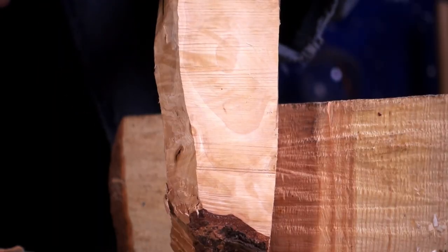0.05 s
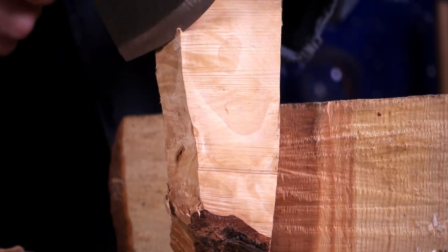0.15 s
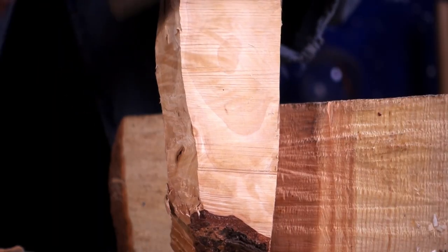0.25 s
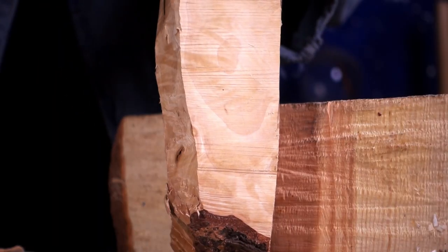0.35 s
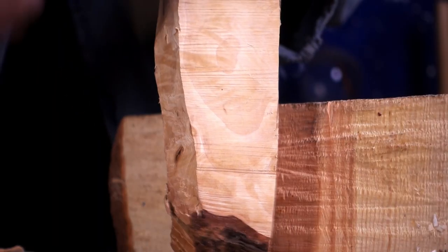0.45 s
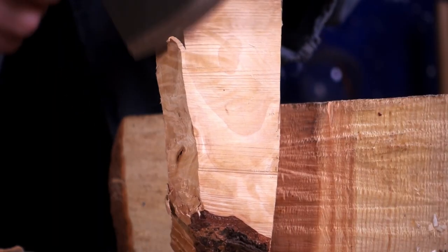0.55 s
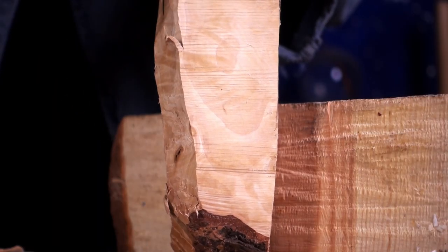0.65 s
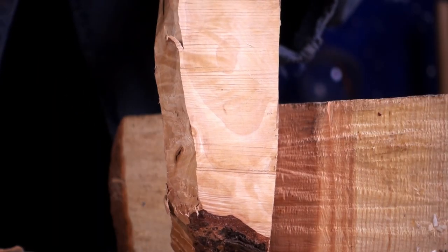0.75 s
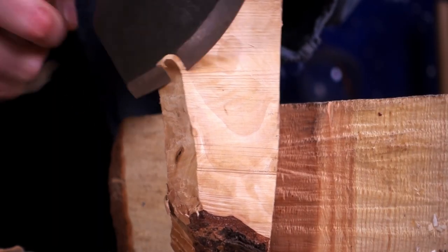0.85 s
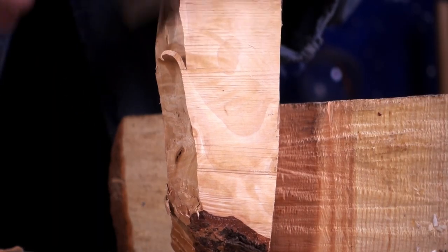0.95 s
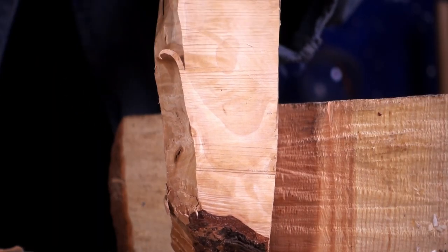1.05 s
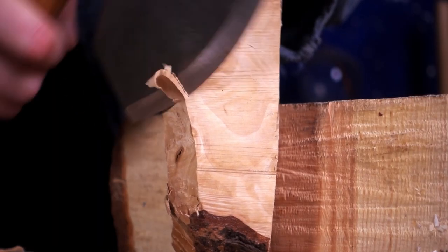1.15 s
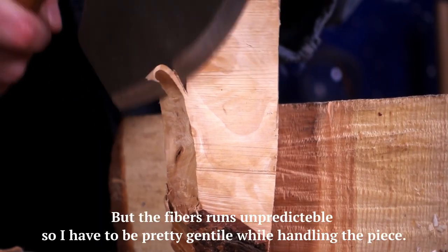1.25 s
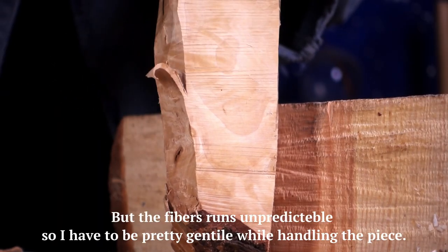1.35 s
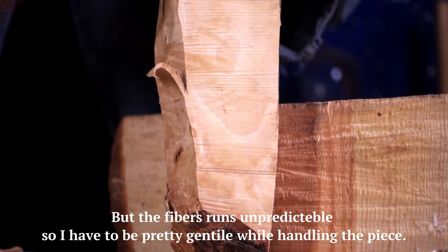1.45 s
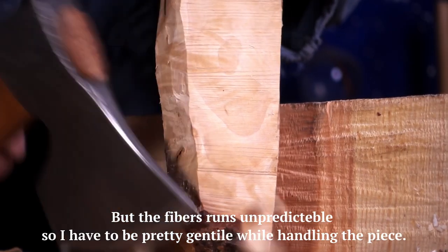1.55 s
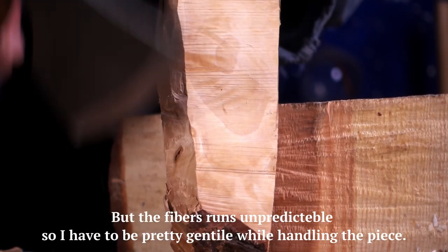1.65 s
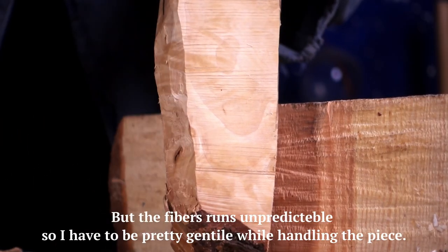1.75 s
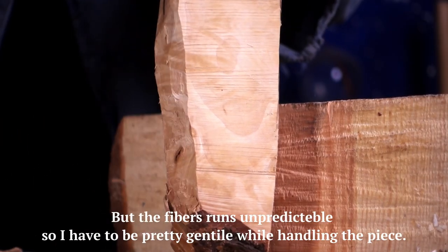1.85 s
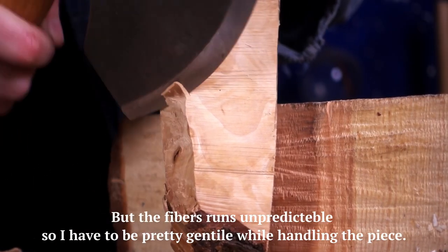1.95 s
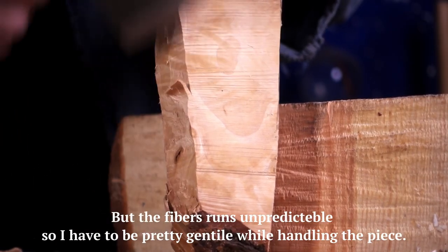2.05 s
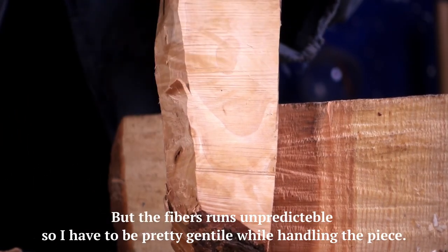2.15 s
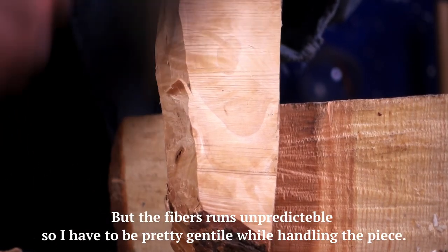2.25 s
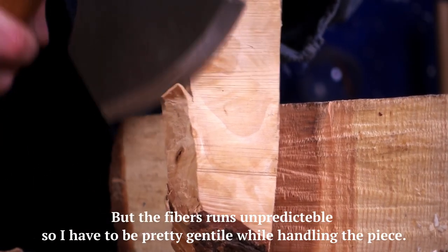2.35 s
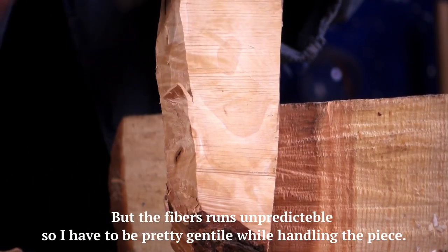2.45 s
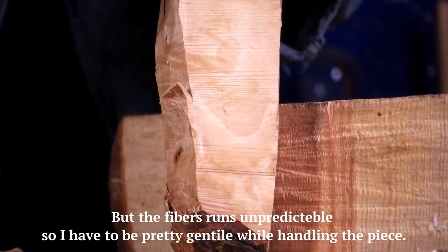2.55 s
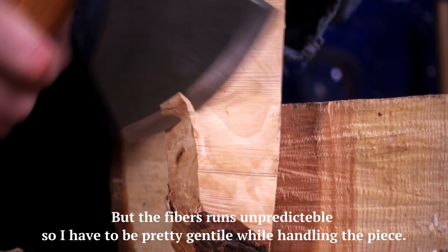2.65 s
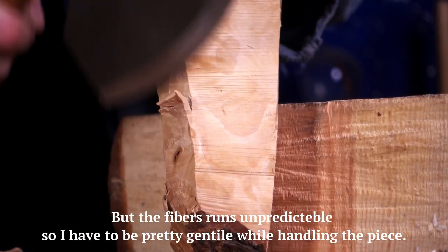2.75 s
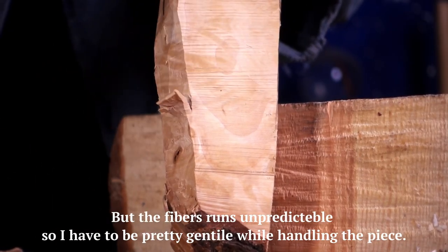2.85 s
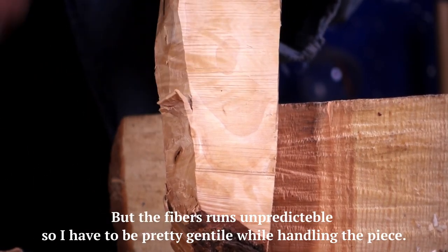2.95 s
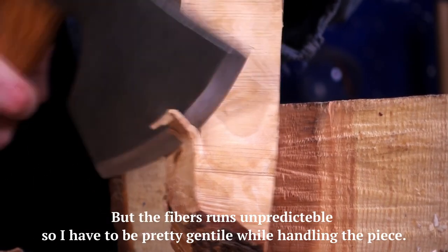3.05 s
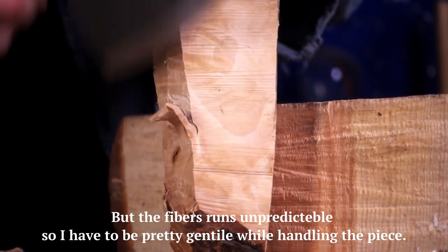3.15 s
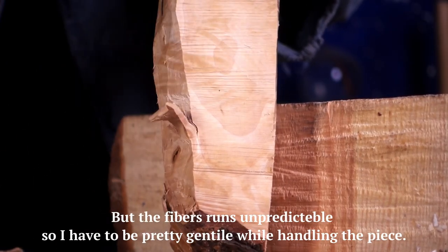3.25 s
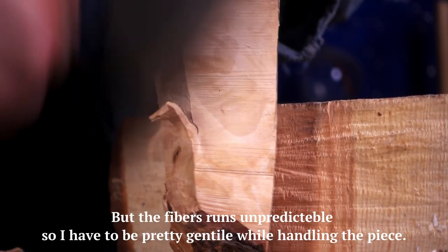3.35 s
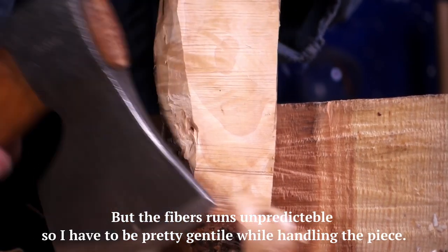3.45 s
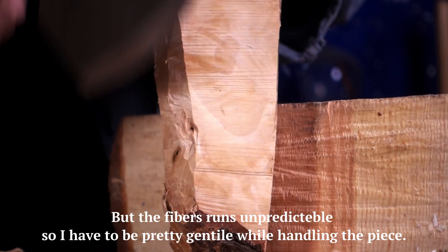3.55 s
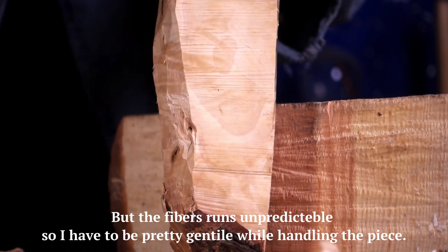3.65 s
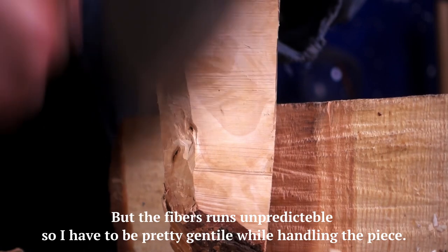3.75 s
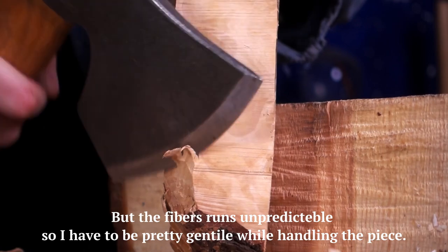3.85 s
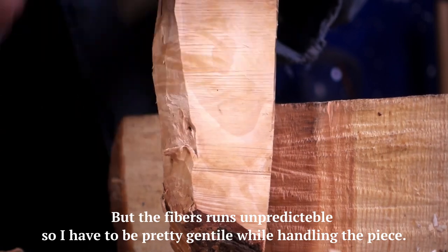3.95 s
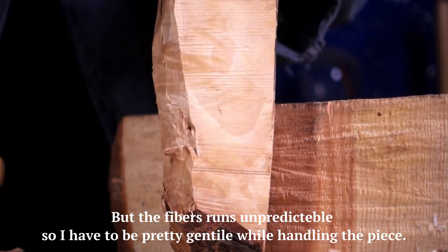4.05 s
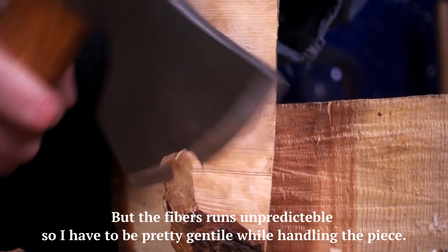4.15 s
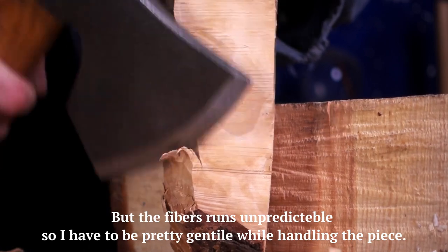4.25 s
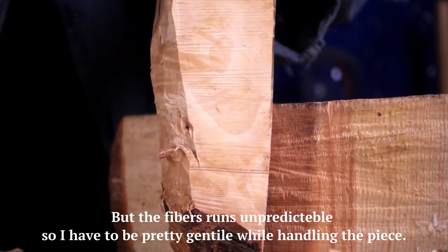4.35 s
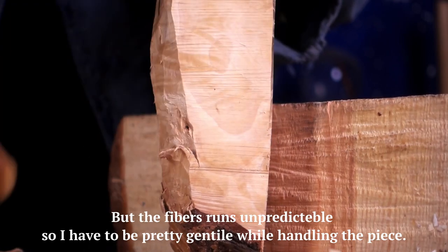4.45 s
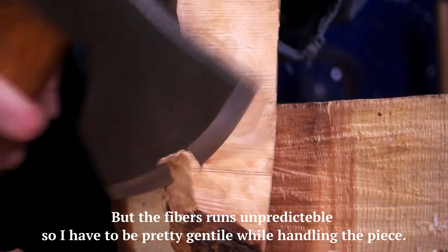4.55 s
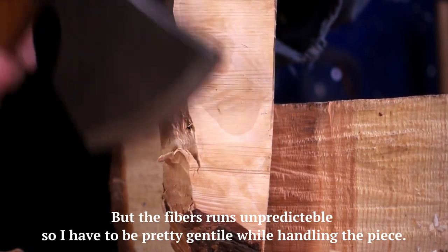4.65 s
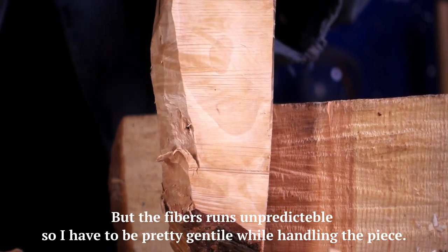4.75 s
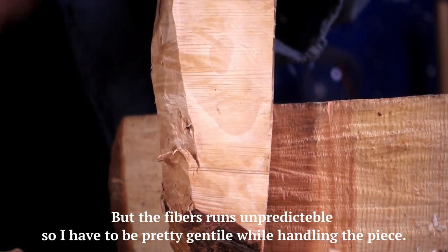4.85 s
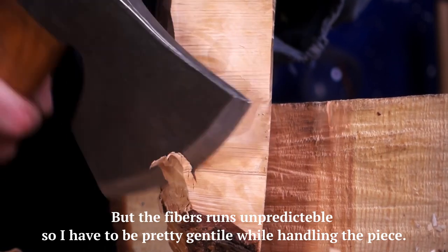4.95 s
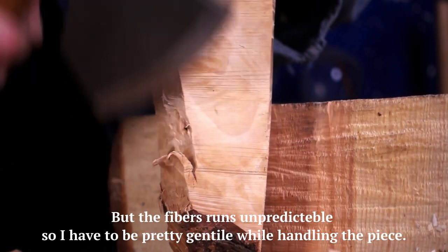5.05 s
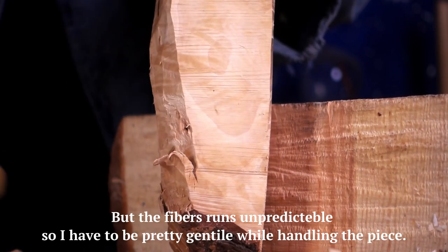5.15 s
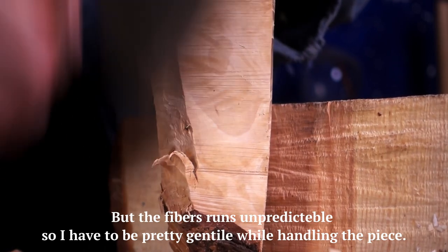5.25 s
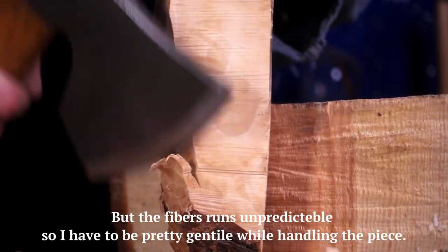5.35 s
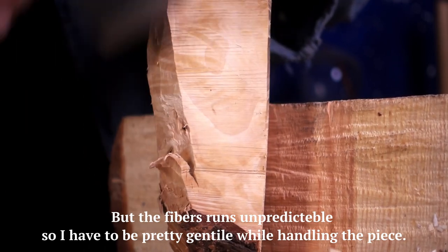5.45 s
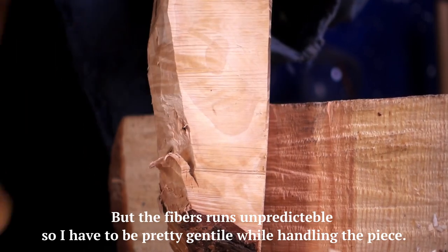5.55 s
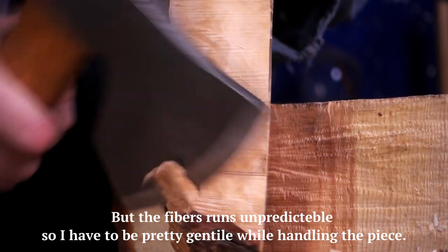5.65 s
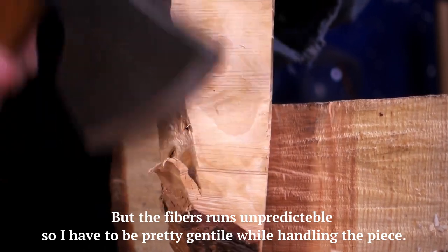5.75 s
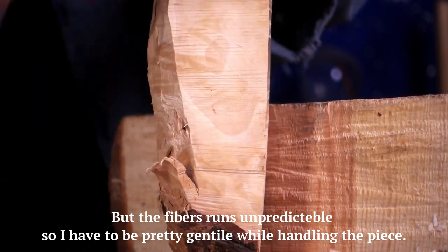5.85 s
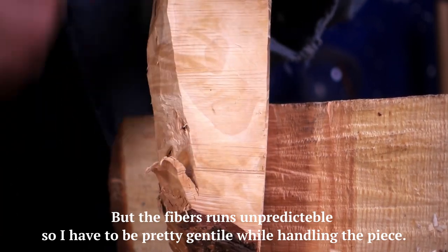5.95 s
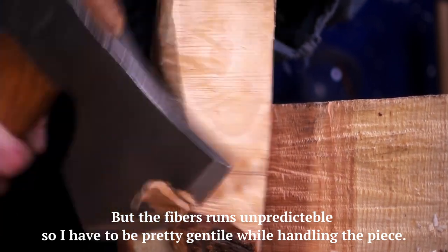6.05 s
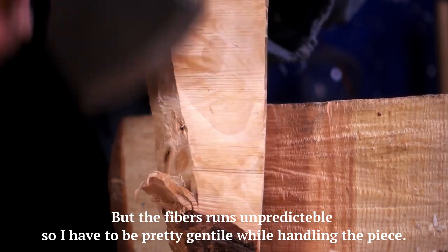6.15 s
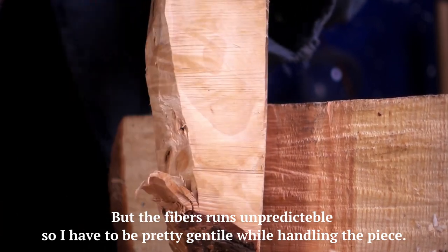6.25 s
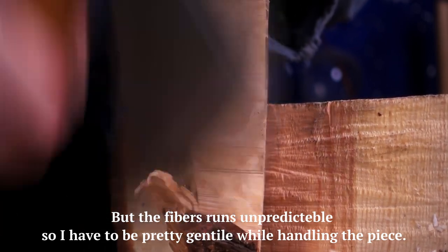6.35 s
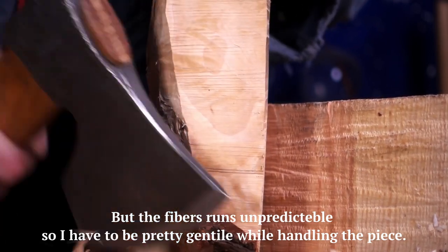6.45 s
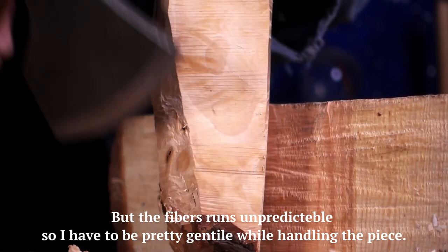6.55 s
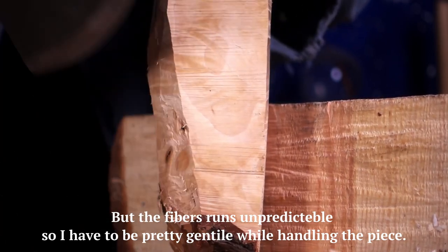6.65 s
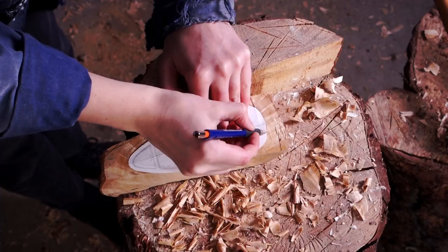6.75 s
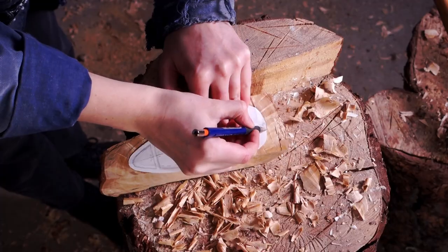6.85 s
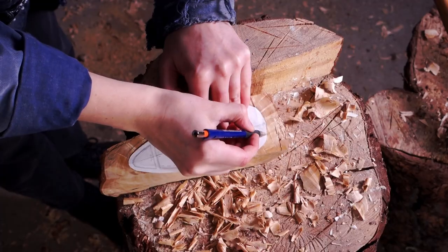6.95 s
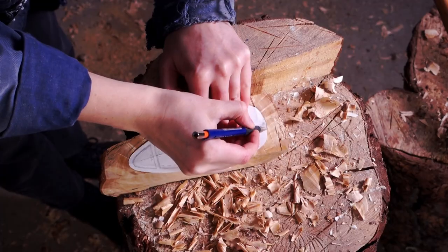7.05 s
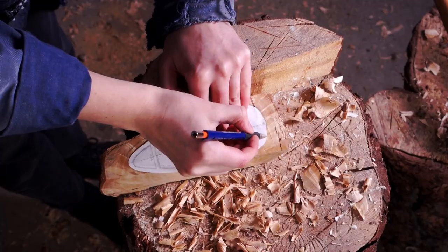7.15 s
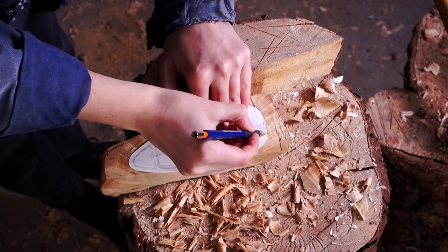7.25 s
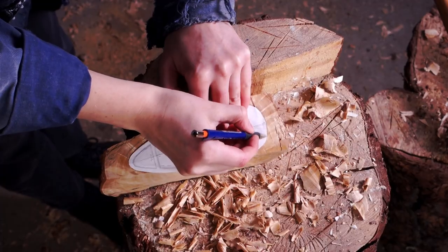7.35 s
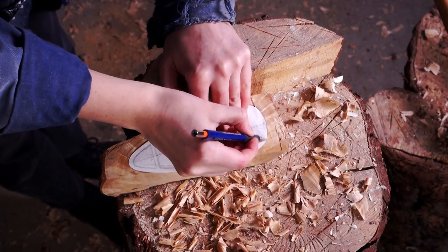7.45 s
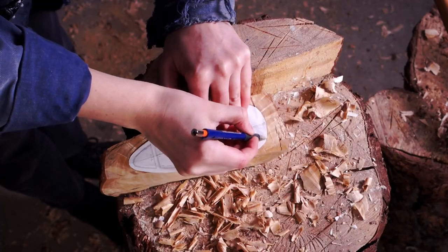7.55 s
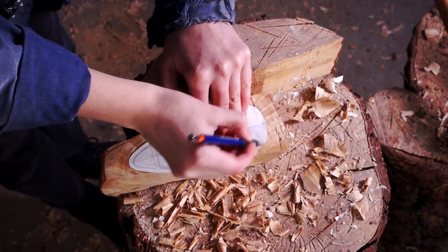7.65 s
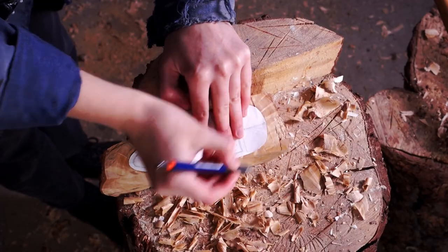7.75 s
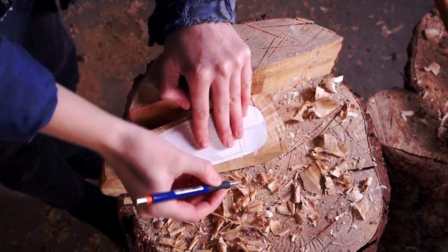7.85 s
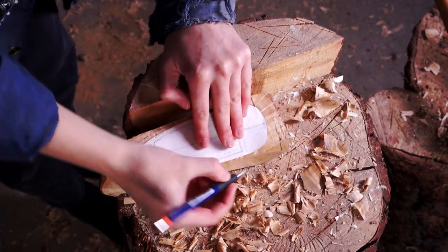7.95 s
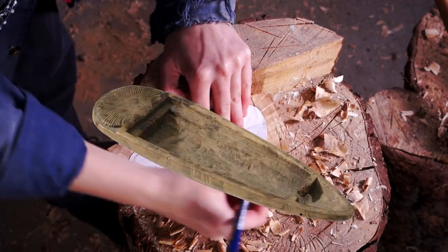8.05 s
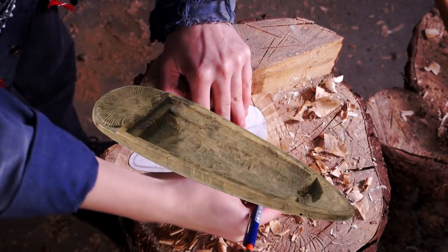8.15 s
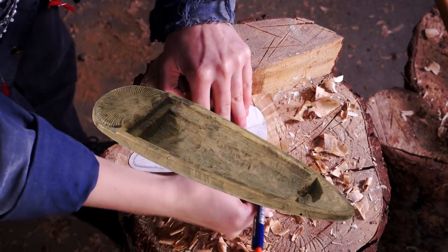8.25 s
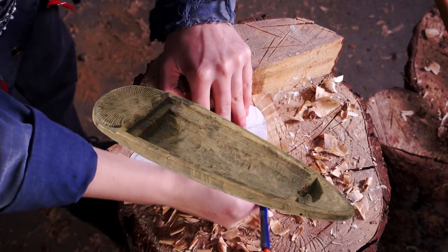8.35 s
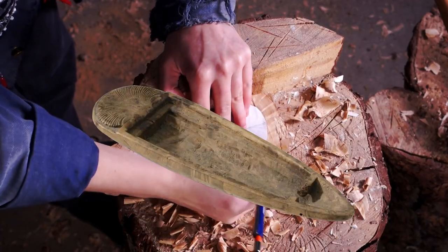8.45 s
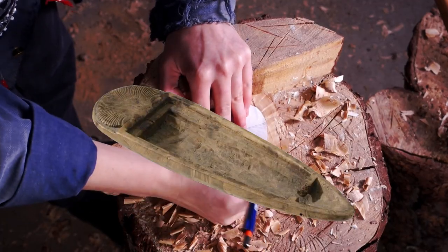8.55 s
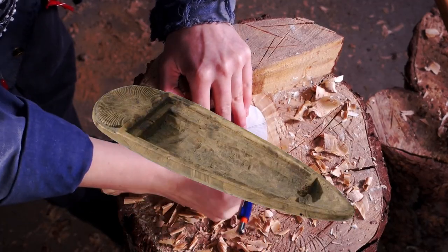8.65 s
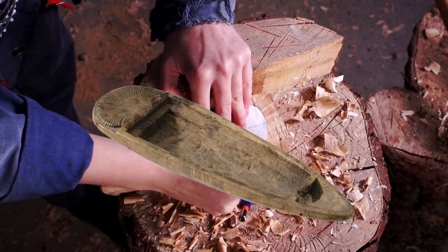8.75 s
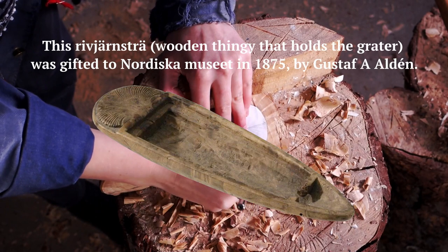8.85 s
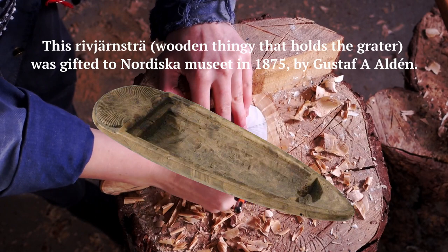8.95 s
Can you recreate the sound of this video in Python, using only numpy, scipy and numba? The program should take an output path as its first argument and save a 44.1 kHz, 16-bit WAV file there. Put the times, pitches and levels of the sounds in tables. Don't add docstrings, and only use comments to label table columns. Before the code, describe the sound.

Brisk axe blows crack and knock through hard wood in a live workshop, cutting to soft sleeve shuffles, crunching shavings and tiny motor ticks.

```python
import sys
import numpy as np
from scipy import signal
from scipy.fft import rfft, irfft
from scipy.io import wavfile
from numba import njit

SR = 44100
rng = np.random.default_rng(int(sys.argv[2]) if len(sys.argv) > 2 else 0)


def gain_from_decibels(decibels):
    exponent = np.asarray(decibels, float) / 20
    return 10 ** exponent


def to_wav(sig):
    pcm = np.clip(np.atleast_2d(sig), -1, 1) * 32767
    pcm = np.round(pcm).astype(np.int16)
    wavfile.write(sys.argv[1], SR, pcm.T)


N = 396900
CUT_S = 6.708


def along(table, hz, count=1):
    rows = np.array(table, float)
    return np.interp(np.log(hz + 1), np.log(rows[:, 0] + 1), rows[:, count])


def unit(x):
    return x / np.sqrt(np.sum(x ** 2))


def band(x, lo_hz, hi_hz):
    return signal.sosfilt(signal.butter(2, [lo_hz, hi_hz], "band", fs=SR, output="sos"), x)


def add(track, sound, s):
    i = int(s * SR)
    track[i:i + len(sound)] += sound[:N - i]


def ring(modes, detune=0.008, size=4096):
    t = np.arange(size)[:, None] / SR
    hz, db, t60 = np.transpose(modes)
    luck = rng.standard_normal((2, len(hz)))
    waves = np.sin(2 * np.pi * hz * (1 + detune * luck[0]) * t) * np.exp(-np.log(1000) * t / t60)
    gains = gain_from_decibels(db + 1.2 * luck[1])
    return unit(waves @ (gains * (-1) ** np.arange(len(hz))))


def clicks(events, cycles, lift_db):
    out, t = np.zeros(N), np.arange(1024) / SR
    for s, db, hz in events:
        swell = hz * t * np.exp(1 - hz * t / cycles) / cycles
        add(out, gain_from_decibels(db + lift_db) * np.sin(2 * np.pi * hz * t) * swell, s)
    return out


def breaks(length_s, spiky_db):
    t = np.arange(4096) / SR
    swell = (1 - np.exp(-t / 0.00024)) * np.exp(-t / length_s)
    return unit(rng.standard_normal(4096) * gain_from_decibels(spiky_db * rng.exponential(size=4096)) * swell)


def bite(length_s, drag_db, size):
    force = gain_from_decibels(drag_db) * breaks(length_s, 1.7)
    add(force, unit(np.hanning(size)), 0)
    return force


# (frequency [Hz], level [dB], t60 [s])
KNOCK = [(620, -4, .022), (765, 0, .022), (860, 0, .02), (965, -1, .018), (1070, -1, .016),
         (1200, -3, .014)]
BODY = [(143, 8.5, 0.065), (189, 4.5, 0.075), (232, 0, 0.14), (238.5, 12.5, 0.026)]
HOLLOW = [(321, 1, 0.029), (450, 2, 0.018), (519, -11.5, 0.075)]
BRIGHT = [(1385, 0, .012), (1570, 0, .012), (1790, -1, .01), (2000, -1, .01), (2230, -2, .009)]
# (frequency [Hz], level [dB], t60 [s])
CRACK = [(2480, -1, 0.0058), (2750, -3.5, 0.0075), (3020, -6.5, 0.0068), (3290, -8.5, 0.0056),
         (3700, -6.5, 0.002)]
# (multiple of chip pitch [ratio], level [dB], t60 [s])
CHIP = [(.84, -2, .008), (1, 0, .011), (1.15, -4, .007), (1.4, -3, .003), (1.75, -6, .002)]


def billet(db, thin_hz, chip_db, chip_hz):
    wood = ring(KNOCK) + gain_from_decibels(db["body"] - 4) * ring(BODY) + gain_from_decibels(db["hollow"]) * ring(HOLLOW)
    wood += gain_from_decibels(db["bright"] - 2.5) * ring(BRIGHT)
    wood += gain_from_decibels(db["thin"]) * ring([(thin_hz, 0, .025)], 0)
    wood -= gain_from_decibels(chip_db - 3.5) * ring(np.array(CHIP) * [chip_hz, 1, 1])
    wood -= gain_from_decibels(db["crack"]) * ring(CRACK, 0.03)
    return wood


# (frequency [Hz], t60 [s])
STEEL = [(3600, .008), (5190, .012), (7230, .009), (10320, .02)]
STEEL_DB = [-27.5, -33, -24]


def steel_head(head_db, low_db):
    upper_db = head_db + 0.5 * rng.standard_normal(len(STEEL_DB)) + STEEL_DB
    steel = np.zeros(4096)
    for mode_db, (hz, t60) in zip([low_db, *upper_db], STEEL):
        twins = [(hz, 0, t60), (1.018 * hz, -4, t60)]
        steel += gain_from_decibels(mode_db + 2.5) * ring(twins, 0.003)
    return steel


# (frequency [Hz], level [dB], t60 [s])
THUMP = [(63.7, -9.5, 0.35), (92.2, -2, 0.4), (130, -1.5, 0.083)]


def block_thump():
    swell = 1 - np.exp(-np.arange(16384) / SR / 0.011)
    return signal.fftconvolve(ring(THUMP, size=16384) * swell, np.hanning(384) / 150)


# (time [s], force [dB], firmness of seat [dB], depth of bite [dB], thin-end pitch [Hz])
CHOPS = [(0.1465, -37.5, 11.5, -9.5, 800), (0.4885, -21.5, -3.5, -3, 1325), (0.8244, -20, -1.5, -2.5, 1508),
         (1.1701, -18, -6, 3, 2118), (1.512, -16, -12.5, -6, 1514), (1.9294, -20.5, 0, 1.5, 1390),
         (2.2862, -13, -0.5, -1.5, 1643), (2.6594, -11.5, -6.5, 7.5, 1570), (3.0327, -13, -7, 11, 2320),
         (3.403, -14.5, -14.5, 5, 2200), (3.81, -19.5, -6, -3, 1220), (4.1878, -15.5, -6, 1.5, 1486),
         (4.5579, -14, -3, -3, 1590), (4.929, -13.5, 1, -3, 1520), (5.2962, -15, 4, -8, 1602),
         (5.668, -12.5, 0.5, 3, 1710), (6.0308, -11.5, -11.5, 0, 1265), (6.4057, -14, -21, 2.5, 1736)]
# (time [s], steel head [dB], its lowest mode [dB], curling chip [dB], chip pitch [Hz])
CUTS = [(0.1462, 11, -42.5, -8.5, 2860), (0.4885, 2, -21.5, -9.5, 3280), (0.8242, 2.5, -30.5, -18.5, 3200),
        (1.1702, 2, -14, -2, 3080), (1.512, 8.5, -16.5, -6.5, 2450), (1.9294, -2, -15, -20.5, 2500),
        (2.2863, -1.5, -24.5, -33.5, 2940), (2.6593, 0.5, -18, -16, 2900), (3.0326, 10.5, -36.5, 4, 2570),
        (3.403, 2, -23, -26.5, 3130), (3.81, -0.5, -31, -14, 3220), (4.1875, 1, -23, -12, 3330),
        (4.5578, 1.5, -28.5, -26, 2600), (4.9289, -5, -16.5, -10.5, 2930), (5.2964, -1, -11, -5.5, 3110),
        (5.668, 9, -42, 0, 3024), (6.0309, 5, -21.5, -1.5, 2515), (6.4054, 2.5, -21, -7, 2480)]
# (level [dB], by seat [dB per dB], by bite [dB per dB])
LAYERS = dict(thump=(-2, 1, 0.1), body=(-1, 0.56, 0.1), hollow=(-4.5, 0.38, 0.1), bright=(0, 0.1, 0.63),
          thin=(-8, 0.069, -.9), crack=(-12.5, -.1, .5), tear=(-36.5, -.7, .3), drag=(0.038, -0.38, 0.1))


def chops():
    out, thump = np.zeros((2, N))
    for (s, force_db, seat_db, bite_db, thin_hz), (_, head_db, low_db, chip_db, chip_hz) in zip(CHOPS, CUTS):
        db = {}
        for name, (base, by_seat, by_bite) in LAYERS.items():
            db[name] = base + by_seat * seat_db + by_bite * bite_db
        wood = billet(db, thin_hz, chip_db, chip_hz)
        steel = steel_head(head_db, low_db)
        wood_force = bite(0.0022, -10 + db["drag"], size=8)
        steel_force = bite(0.0082, db["drag"], size=3)
        tear = band(breaks(0.0081, 3.5), 2600, 17000)
        add(out, gain_from_decibels(force_db + 22) * signal.fftconvolve(wood_force, wood), s)
        add(out, gain_from_decibels(force_db + 24.5) * signal.fftconvolve(steel_force, steel), s)
        add(out, gain_from_decibels(force_db + db["tear"] + 40.5) * tear, s)
        add(thump, gain_from_decibels(force_db + db["thump"] + 27.5) * block_thump(), s)
    return out, thump


# (frequency [Hz], level [dB], t60 [s])
LANDING = [(110, -5, .05), (150, -4, .035), (210, -3, .035), (300, 2, .009), (600, 1, .005)]
# (time [s], level [dB])
LANDINGS = [
    (1.5755, -13),
    (3.4425, -12.5),
    (6.430, -13.5),
]


def landings():
    out = np.zeros(N)
    for s, db in LANDINGS:
        add(out, gain_from_decibels(db + 29) * np.convolve(ring(LANDING), np.hanning(40) / 20), s)
    return out


# (time [s], peak level [dB], pitch [Hz])
SNAPS = [(0.4394, -53, 8290), (1.2084, -29, 10400), (1.3803, -49, 7180), (1.5429, -17.5, 11300),
         (1.5664, -33.5, 10200), (1.6796, -41.5, 9660), (1.6931, -40.5, 8690), (2.2922, -31, 10600),
         (2.4114, -44.5, 7770), (3.2154, -60.5, 7110), (3.4244, -22.5, 10300), (3.5808, -46, 11200),
         (3.5914, -41, 9010), (3.6242, -44.5, 8160), (3.6691, -47.5, 7320), (4.2124, -38, 10500),
         (4.567, -21, 10400), (4.9634, -26, 10300), (5.7614, -37.5, 10300), (6.0604, -17, 10500),
         (6.4113, -25, 7430), (6.4274, -32, 10400), (6.6154, -52, 7540)]


def snaps():
    return clicks(SNAPS, 0.34, 10.3)


# (time [s], rub level [dB], rustle level [dB], rise [s per 20 dB], fade [s per 20 dB])
SHUFFLE = [
    (7.68, -78, -44, .02, .1),
    (7.871, -97, -45.5, 0.024, .08),
    (7.93, -86, -45, .05, 0.2),
    (8.32, -77.5, -38, 0.077, 0.16),
    (8.655, -92, -44, 0.11, 0.044),
    (8.96, -77, -46, 0.017, .09),
]


def shuffle():
    t = np.arange(N) / SR
    s, rub_db, rustle_db, rise_s, fade_s = np.transpose(SHUFFLE)[:, :, None]
    move = gain_from_decibels(-20 * np.maximum((s - t) / rise_s, (t - s) / fade_s))
    noise = rng.standard_normal((3, N)) * gain_from_decibels(2.0 * rng.exponential(size=(3, N)))
    resting = gain_from_decibels(-89.5 + 16) * (t > s[0])
    rub = band(noise[0], 566, 3240) * (np.sum(move * gain_from_decibels(rub_db + 14), 0) + resting)
    rustle = band(noise[1], 4900, 15000) * np.sum(move * gain_from_decibels(rustle_db - 23.5), 0)
    scrape = 0.26 * band(noise[2], 5100, 5900) + 0.23 * band(noise[2], 5700, 9200)
    stroke = gain_from_decibels(-52 + 9) * np.exp(-((t - 8.652) / 0.012) ** 2 / 2)
    return rub + rustle + scrape * stroke


# (time [s], peak level [dB], pitch [Hz])
CRUNCHES = [
    (7.6725, -41, 8430),
    (8.0701, -41, 12800),
    (8.2911, -42, 7330),
    (8.319, -40, 7110),
    (8.3774, -43, 8840),
    (8.4317, -39, 9970),
    (8.9174, -47, 5000),
    (8.9521, -41, 7810),
]


def crunches():
    return clicks(CRUNCHES, 0.96, -2.4)


# (time [s], peak level [dB], pitch [Hz])
TAPS = [
    (7.673, -56, 3450),
    (8.303, -49, 2330),
    (8.319, -34.5, 2440),
    (8.3304, -39, 2500),
    (8.341, -39, 2490),
    (8.3594, -53, 2030),
    (8.9526, -65, 3520),
]


def taps():
    return clicks(TAPS, 1.0, -1.1)


# (time [s], peak level [dB], pitch [Hz])
TICKS = [
    (6.731, -49, 770),
    (6.763, -43, 722),
    (8.133, -53, 670),
    (8.365, -56, 790),
    (8.418, -49.5, 732),
    (8.759, -55, 790),
]


def motor(count=14):
    luck = rng.standard_normal((count, 3)) * [.002, 1.6, 30]
    first = [8.4555, -53, 740]
    run = first + np.arange(count)[:, None] * [.0396, 0, 0] + luck
    return clicks([*TICKS, *run.tolist()], 1.0, 0.1)


# (frequency [Hz], t60 [s], level [dB])
ROOM = [(60, 0.46, 1.5), (250, 0.51, -1.5), (1000, 0.49, 3), (1990, 0.51, 7), (3700, 0.54, 4),
        (7930, 0.42, -2), (15000, 0.14, -0.5)]
# (frequency [Hz], level [dB])
ROOM_SIDE = [(60, -27), (250, -29.5), (1000, -15.5), (2000, -15), (4000, -2), (8000, 0.5), (14000, -5)]


def room(build_s, wet_db):
    t = np.arange(SR) / SR
    out = np.zeros((2, SR))
    sparse = gain_from_decibels(3.2 * rng.exponential(size=SR) * np.exp(-t / 0.047))
    for hz in 45 * 2 ** np.arange(0, 8.6, .5):
        noise = band(rng.standard_normal((2, SR)) * sparse, hz / 2 ** 0.45, hz * 2 ** 0.22)
        fade = gain_from_decibels(along(ROOM, hz, count=2) - 60 * t / along(ROOM, hz))
        out += noise * fade * np.array([[1], [gain_from_decibels(along(ROOM_SIDE, hz))]])
    out = unit(out * (1 - np.exp(-(t / build_s) ** 2))) * gain_from_decibels(wet_db)
    out[0, 0] = 1
    return out


# (frequency [Hz], density [dB per Hz])
SHOP = [(15, -39.5), (25, -10.5), (53, -4.5), (120, -12.5), (317, -17.5), (343, -16.5), (415, -22.5),
        (543, -17.5), (1360, -17.5), (1520, -19.5), (2040, -15), (2470, -23), (3230, -29), (10300, -31),
        (15900, -28.5)]
SHOP_DB = -62.5
# (frequency [Hz], rms level [dB])
WHINE = [(15600, -90)]


def shop():
    hz = np.arange(N // 2 + 1) * SR / N
    spread = [np.ones_like(hz), np.minimum(hz / 500, 1)]
    mid, side = irfft(rfft(rng.standard_normal((2, N))) * gain_from_decibels(along(SHOP, hz)) * spread, N)
    air = np.array([mid + side, mid - side]) * gain_from_decibels(SHOP_DB) / mid.std()
    t = np.arange(N) / SR
    whine = sum(gain_from_decibels(db) * np.sqrt(2) * np.sin(2 * np.pi * f * t) for f, db in WHINE)
    return (air + whine) * gain_from_decibels(5 * (t < CUT_S))


# (frequency [Hz], level [dB])
PORT_DB = [(60, 0), (250, .7), (600, 2.8), (1500, 4.2), (4000, 2), (8000, 5), (15000, 3.5)]
# (frequency [Hz], phase [rad])
PORT_RAD = [(0, 0), (40, -.1), (200, -.32), (900, -.72), (3000, -.6), (8000, -.4), (16000, 0)]


def ports(stereo):
    hz = np.arange(N // 2 + 1) * SR / N
    port = gain_from_decibels(along(PORT_DB, hz) / 2) * np.exp(.5j * along(PORT_RAD, hz))
    return irfft(rfft(stereo) * [port, 1 / port], N)


def scene():
    t = np.arange(N) / SR
    blows, thump = chops()
    loud = blows + landings() + snaps()
    before = signal.fftconvolve(loud[None], room(0.0044, -.5), axes=1)[:, :N]
    before = (before + thump * [[1], [0]]) * np.clip((CUT_S - t) / 0.019, 0, 1)
    faint = crunches() + taps() + gain_from_decibels(6) * shuffle()
    after = signal.fftconvolve(faint[None], room(0.0033, -7.5), axes=1)[:, :N]
    mid, side = before + after
    mid = mid + motor()
    return ports(np.array([mid + side, mid - side]) + shop())


@njit
def limiter(x, top, slope, attack, release, ahead):
    y, e = np.empty_like(x), 1e-9
    for i in range(x.shape[1]):
        j = min(i + ahead, x.shape[1] - 1)
        a = max(abs(x[0, j]), abs(x[1, j]))
        e += (a - e) * (attack if a > e else release)
        y[:, i] = x[:, i] * min(1., (top / e) ** slope)
    return y


def band_limit(x):
    return signal.sosfilt(signal.butter(12, 16990, fs=SR, output="sos"), x)


def record(dry):
    heard = signal.sosfilt(signal.butter(3, 42, "high", fs=SR, output="sos"), dry)
    heard = signal.sosfilt(signal.ellip(8, .3, 60, 16100, fs=SR, output="sos"), heard)
    attack_s, release_s = .0006, 0.004
    held = limiter(heard, 0.18, 0.84, 1 / (attack_s * SR), 1 / (release_s * SR), ahead=16)
    mix = np.tanh(held / 1.022) * 0.77
    return band_limit(mix)


dry = scene()
out = record(dry)
to_wav(out)
```